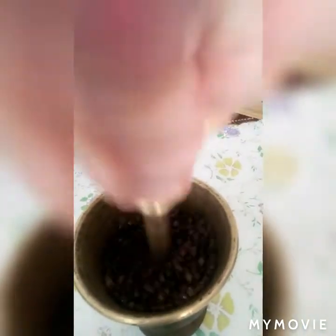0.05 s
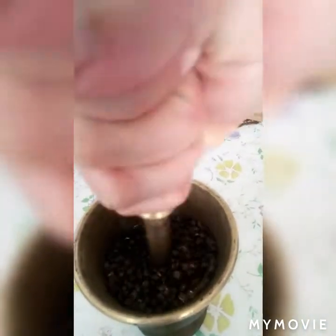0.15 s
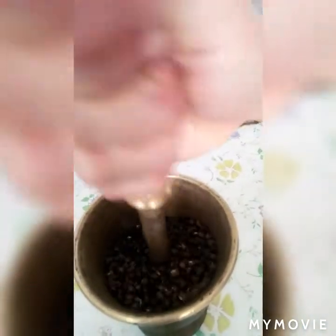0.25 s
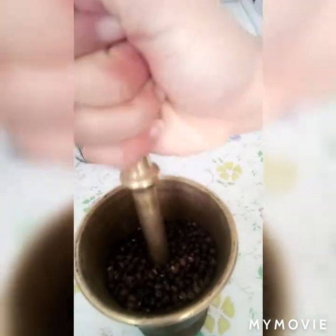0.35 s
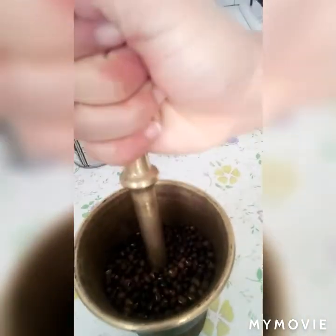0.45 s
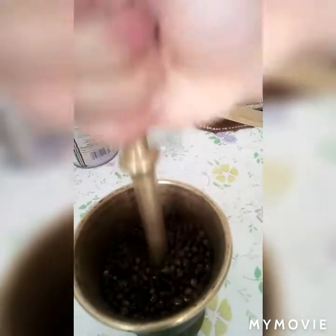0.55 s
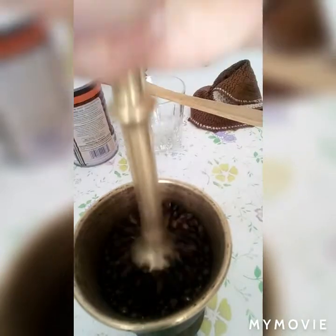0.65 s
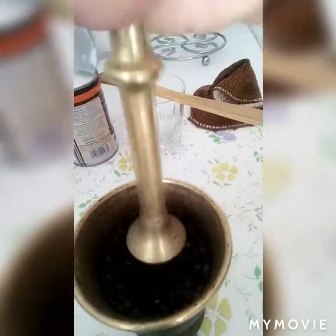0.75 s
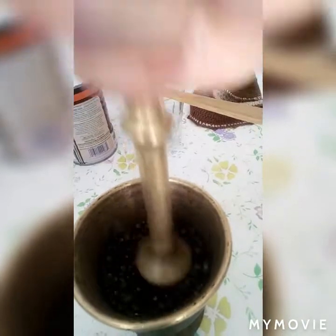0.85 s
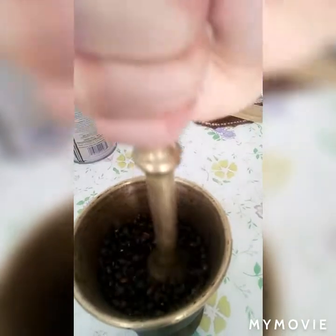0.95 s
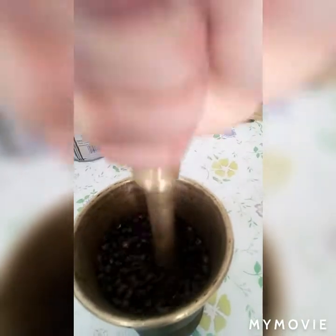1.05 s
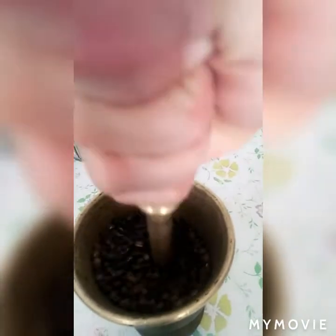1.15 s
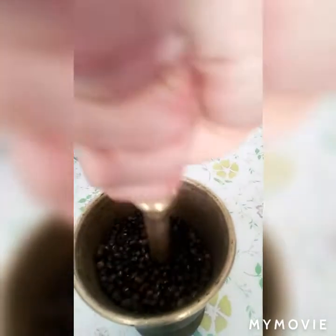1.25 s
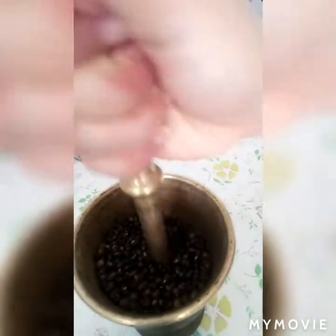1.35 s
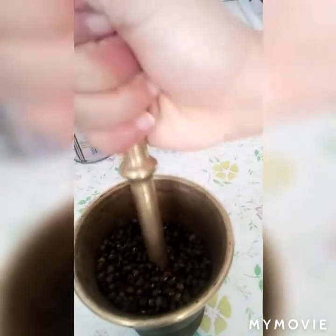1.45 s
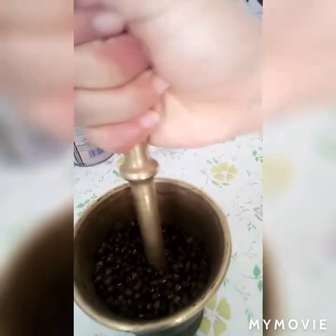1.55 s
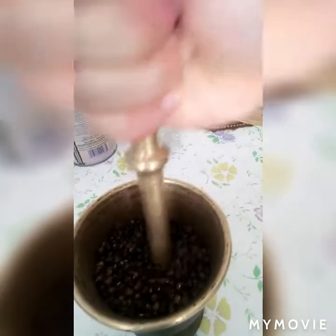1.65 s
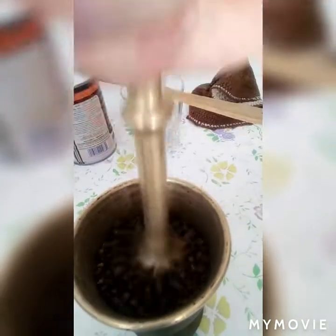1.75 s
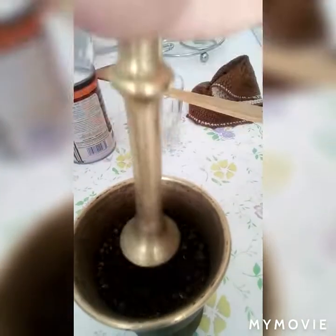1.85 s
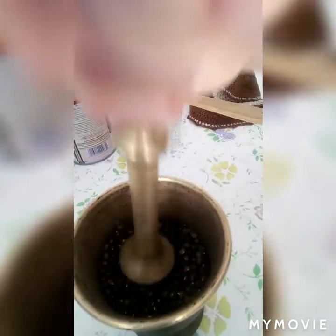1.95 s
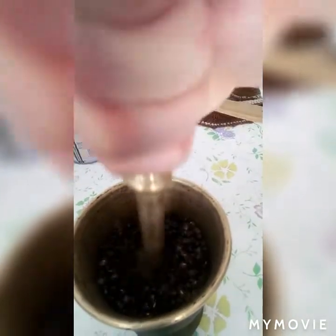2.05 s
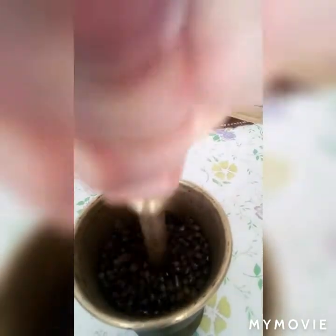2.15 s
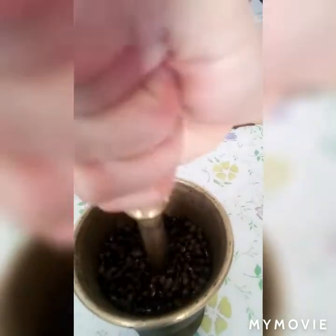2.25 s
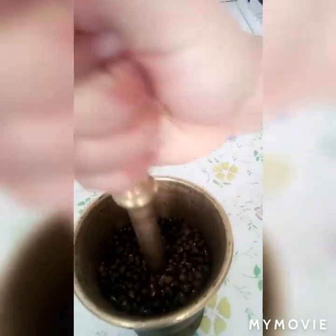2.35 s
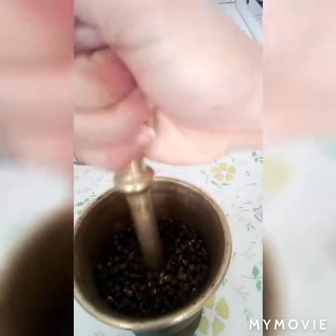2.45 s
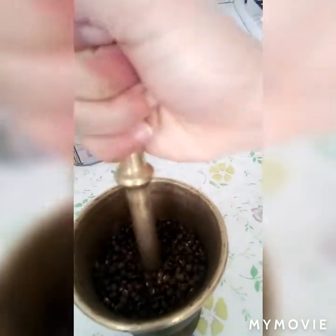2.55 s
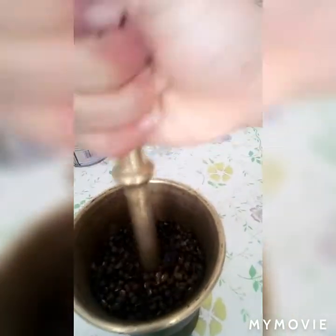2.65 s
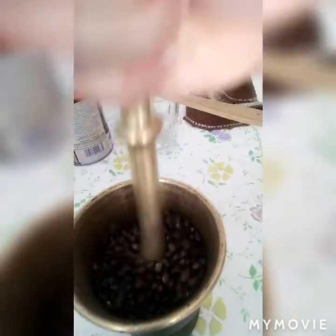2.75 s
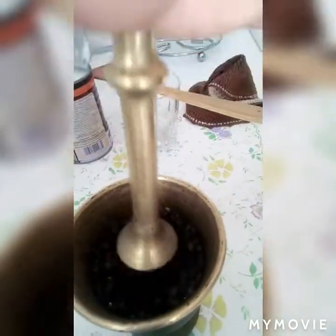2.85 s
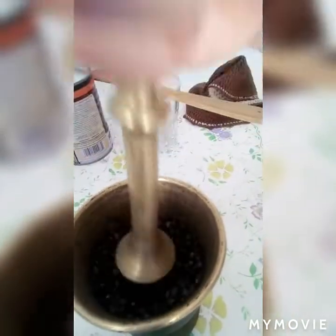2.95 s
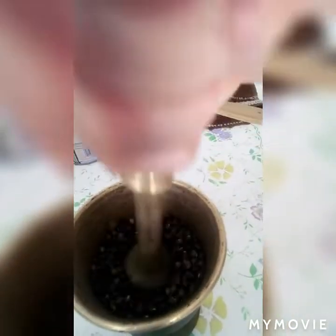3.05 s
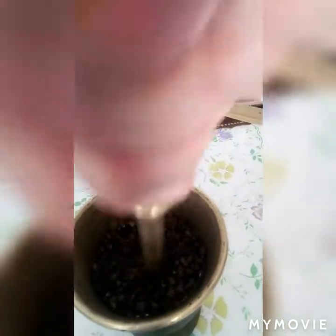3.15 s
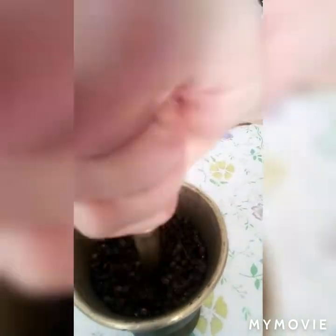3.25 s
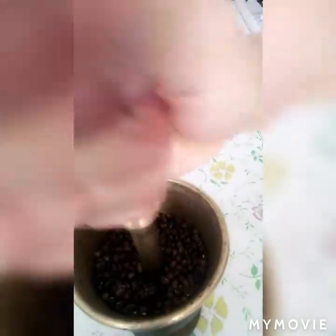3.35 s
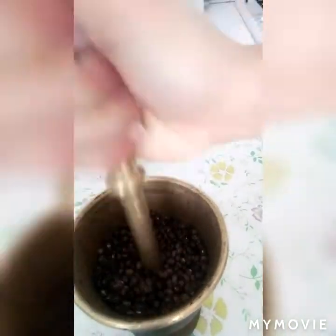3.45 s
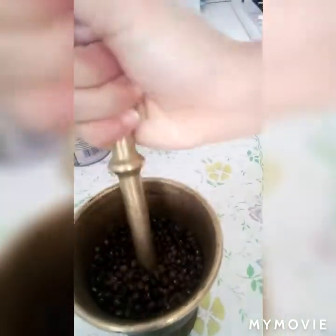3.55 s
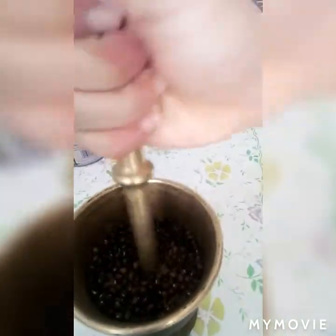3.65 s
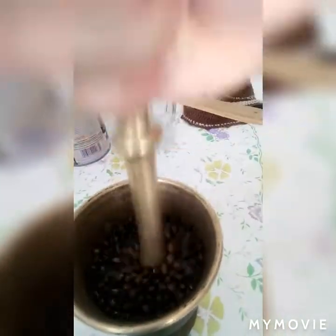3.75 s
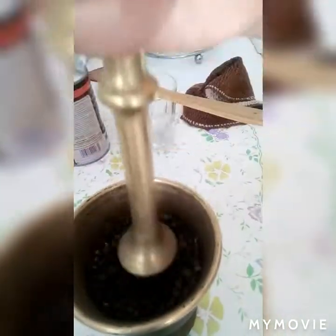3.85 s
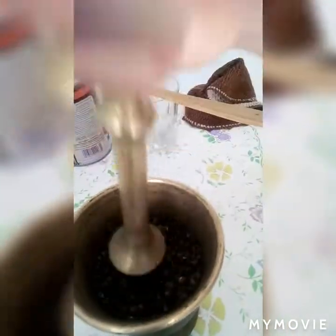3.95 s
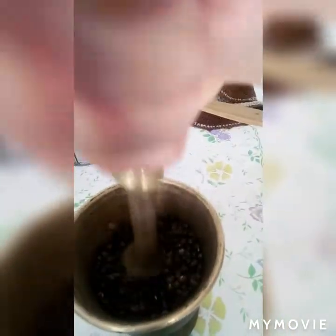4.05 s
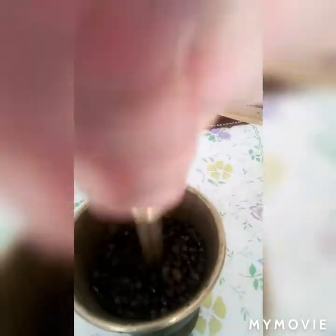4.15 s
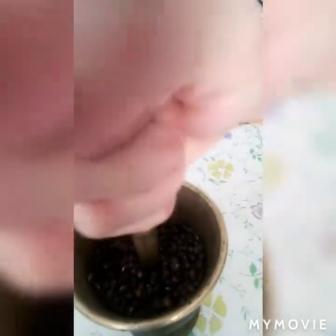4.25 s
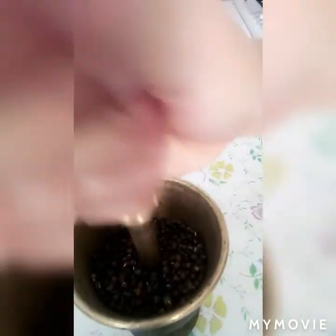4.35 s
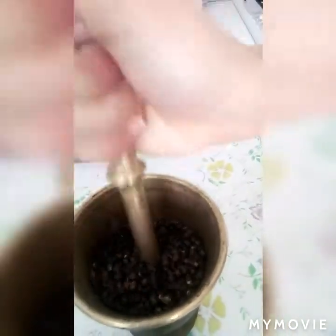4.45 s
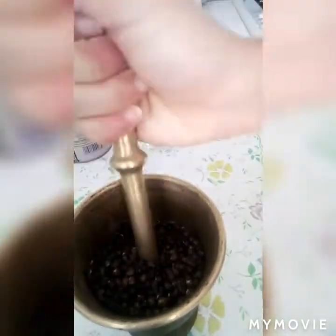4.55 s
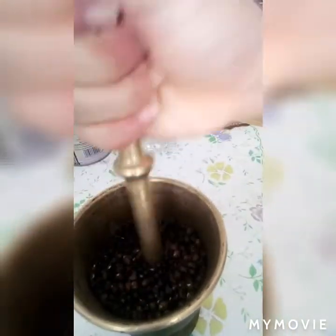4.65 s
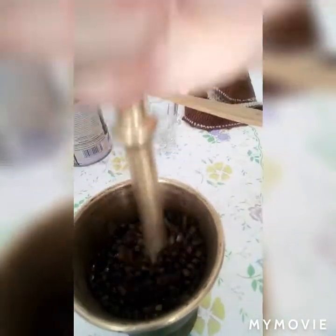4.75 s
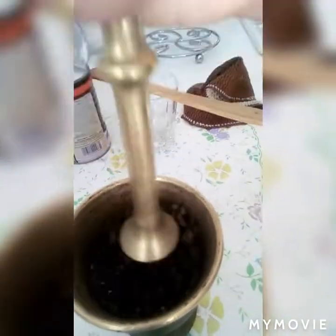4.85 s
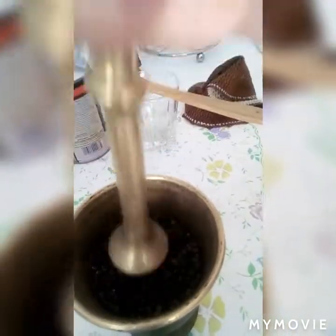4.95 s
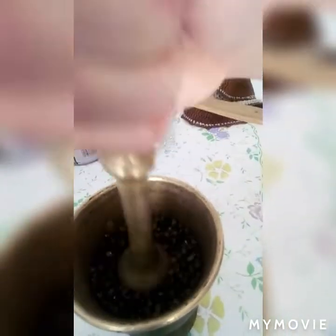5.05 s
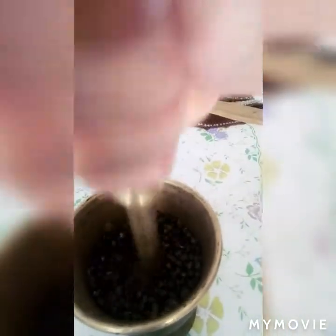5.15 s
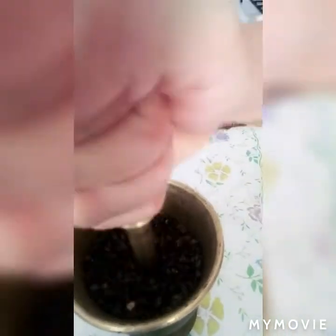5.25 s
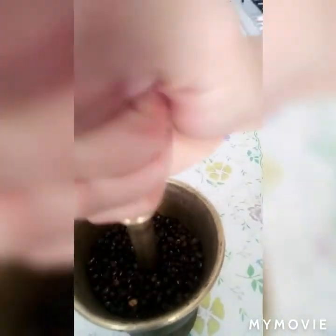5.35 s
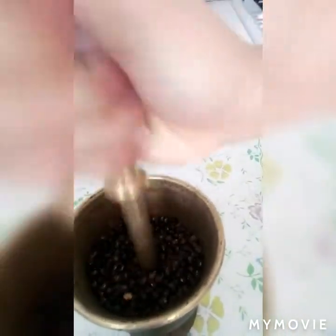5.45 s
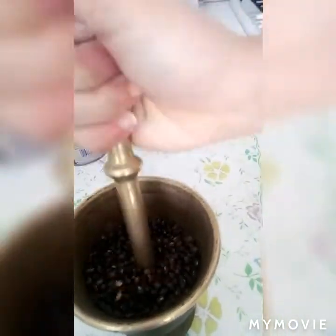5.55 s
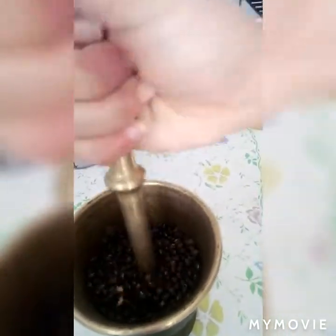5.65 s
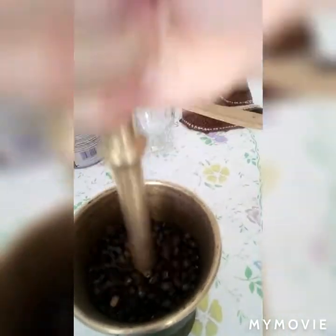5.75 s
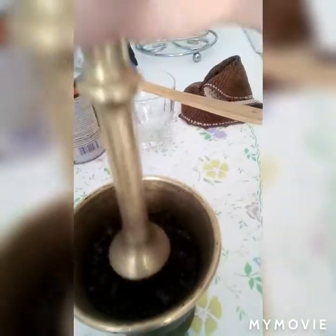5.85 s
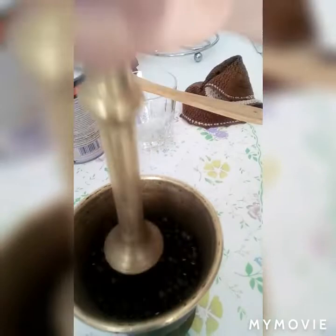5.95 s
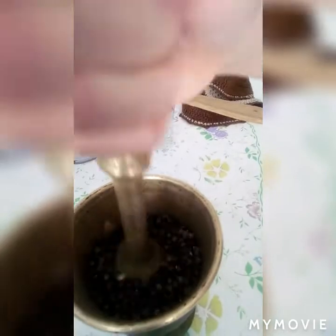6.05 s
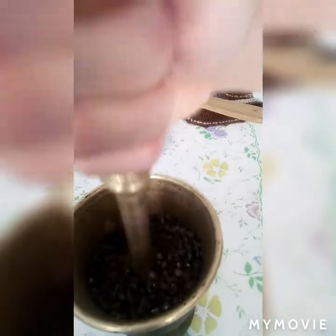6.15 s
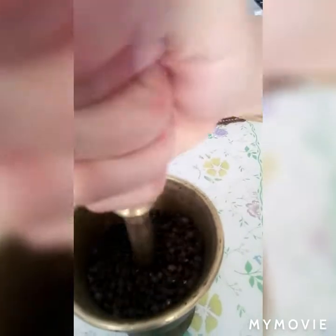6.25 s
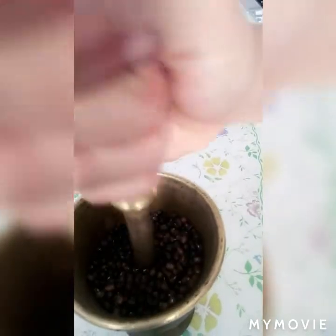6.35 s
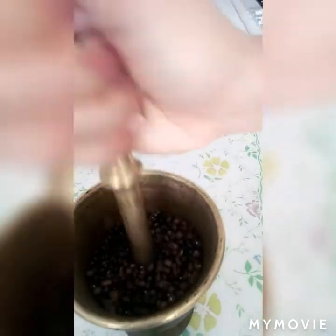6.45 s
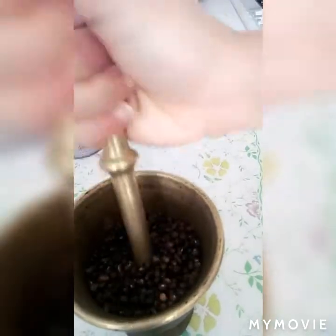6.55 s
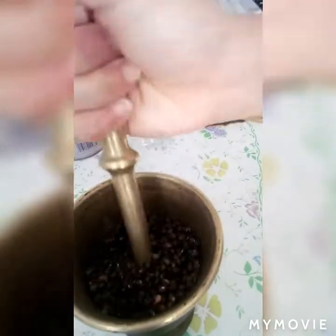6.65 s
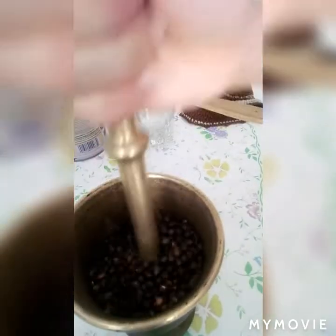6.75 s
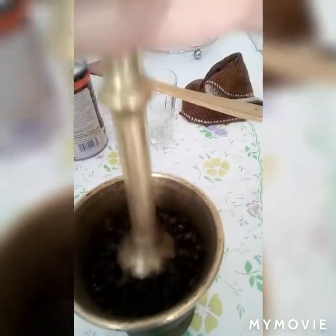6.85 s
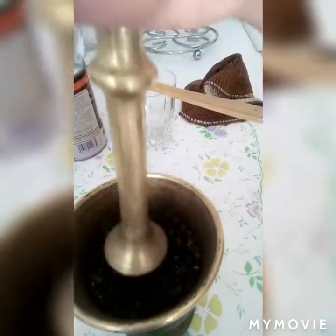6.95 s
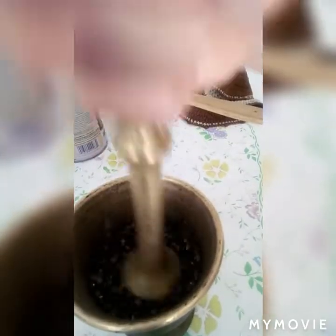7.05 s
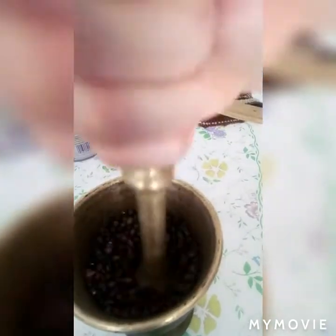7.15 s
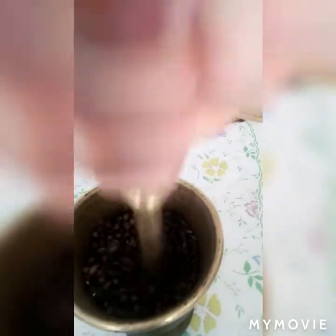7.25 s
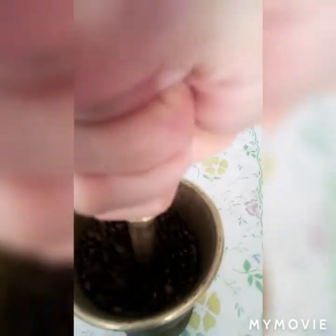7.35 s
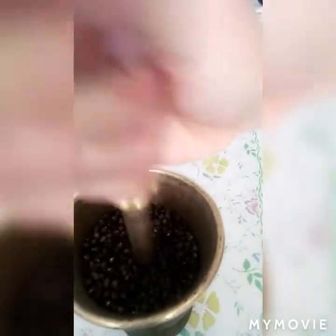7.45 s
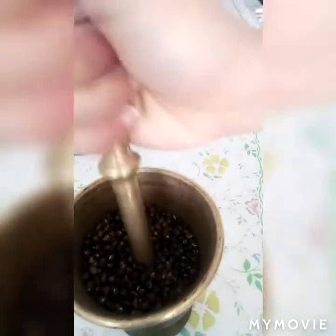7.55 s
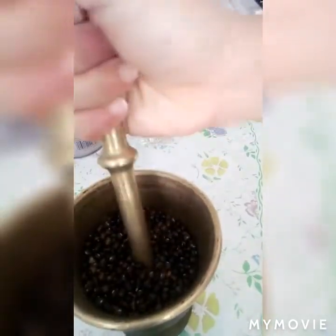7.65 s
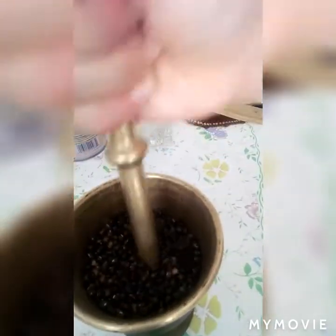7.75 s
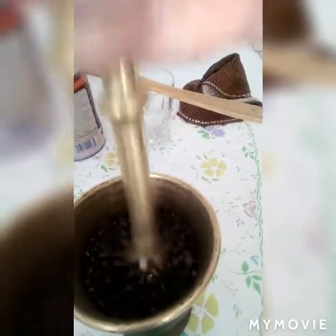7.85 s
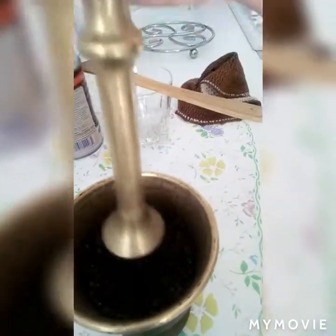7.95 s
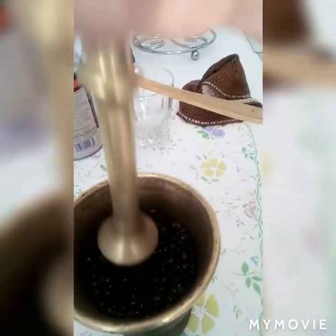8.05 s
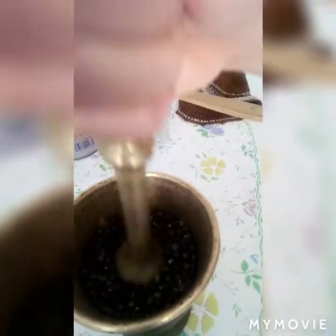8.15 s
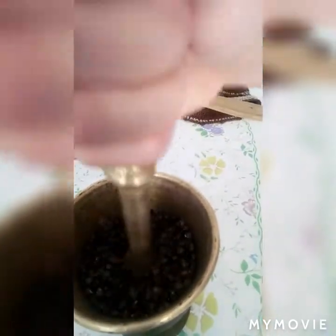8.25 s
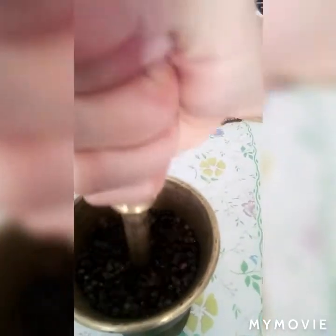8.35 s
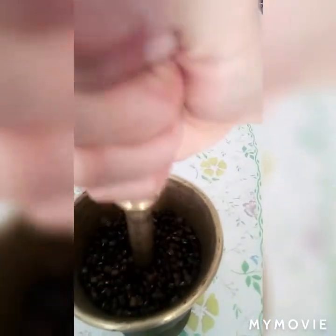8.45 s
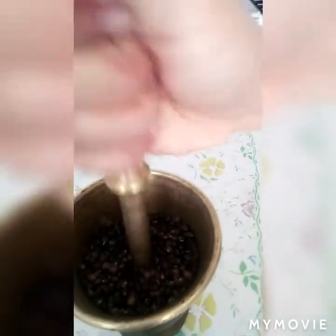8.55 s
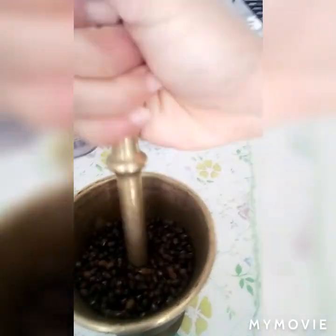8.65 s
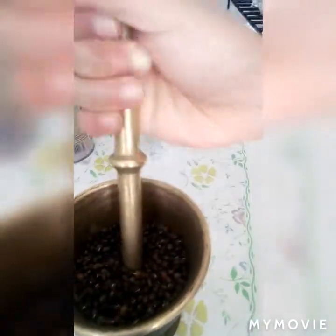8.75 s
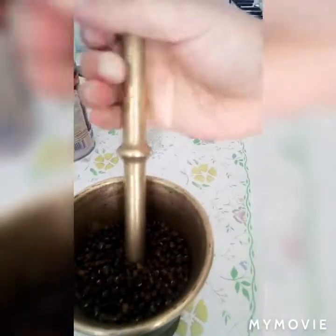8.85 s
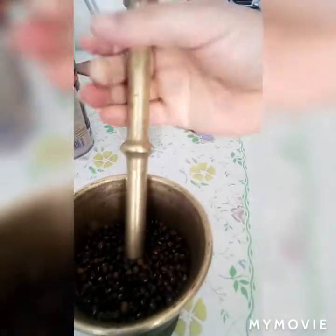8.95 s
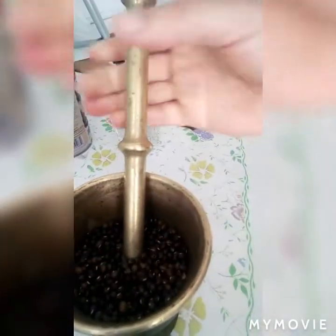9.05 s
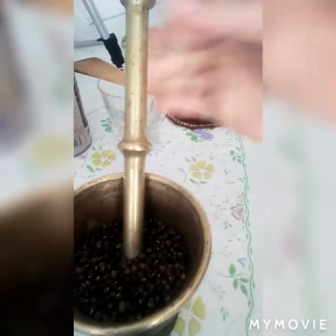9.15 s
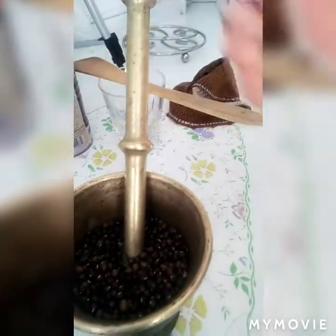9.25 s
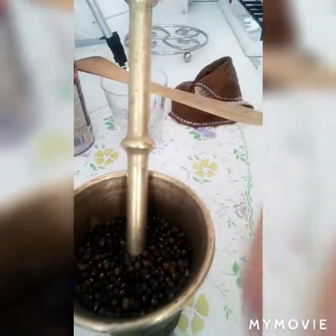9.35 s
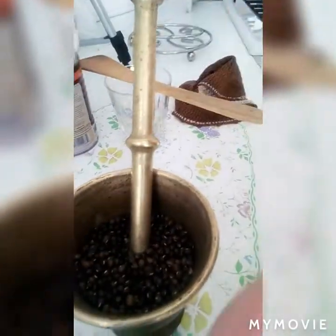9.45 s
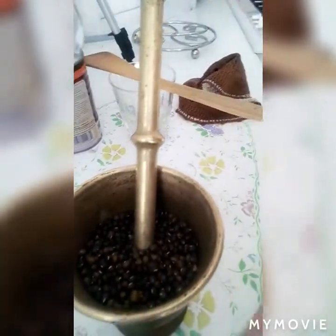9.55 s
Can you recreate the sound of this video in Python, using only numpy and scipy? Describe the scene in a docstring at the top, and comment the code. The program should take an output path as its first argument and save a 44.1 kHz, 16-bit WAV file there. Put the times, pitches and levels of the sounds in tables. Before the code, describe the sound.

Nine steady strokes of a brass pestle crush hard beans with bright rattle, low thumps and sharp snaps, ending in a ringing clink.

```python
"""A small microphone stands close to a brass mortar of dry beans on a kitchen table, in a faint hush.
About once a second a brass pestle drops into the beans, is pressed down, ground round and drawn up again.
Tapping beans become coloured rattle and feed the modes of the pestle; each press shakes the table and the bed,
and single beans crack as snaps of noise with a knock and a short room tail. At the end the shaft brushes the rim,
then the pestle is let fall against the wall: the clink rings bowl and pestle, and the strokes stop."""
import sys
import numpy as np
from scipy import signal
from scipy.io import wavfile

SR = 44100
rng = np.random.default_rng(int(sys.argv[2]) if len(sys.argv) > 2 else 0)


def master_out(mix):
    """Clip the mix to full scale and print it as 16-bit PCM to the path in sys.argv[1]."""
    frames = np.transpose(np.atleast_2d(mix))
    ceiling = np.clip(frames, -1, 1)
    pcm = np.round(ceiling * 32767).astype(np.int16)
    wavfile.write(sys.argv[1], SR, pcm)


N = 423357  # samples

# What drives each stroke; levels are those of the drive, before each source's colour and mix gain.
# The head drops into the beans. Each row: start in seconds, then bean rattle, pestle ring,
# table rumble and bed crunch in dB.
PLUNGES = [(-0.005, -34.5, -36, -52, -57), (1.049, -32.5, -37, -53, -57), (2.15, -31.5, -33.5, -51, -53.5),
           (3.205, -36, -35.5, -50.5, -56), (4.196, -34, -34.5, -55, -53), (5.222, -33.5, -35, -50.5, -53),
           (6.211, -31.5, -34.5, -49.5, -56.5), (7.222, -33, -35, -51, -52.5),
           (8.281, -33.5, -36, -54.5, -54.5)]
# Swell of the plunge in seconds, then its fall in dB per s: for rattle, ring, rumble, crunch.
PLUNGE_SWELL_S = [0.027, 0.016, 0.024, .04]
PLUNGE_FALL = [205, 170, 45.6, 100]
PLUNGE_STEEP = 0.45  # power of the swell in amplitude
TOUCH_DB, TOUCH_RISE = -17, 1200  # the first beans touched: dB under the plunge, dB per s

# The hand bears down. Each row: start in seconds, hold of rumble and crunch in seconds,
# then rattle, ring, rumble and crunch in dB.
PRESSES = [(0.248, 0.034, -27, -31.5, -25, -33), (1.298, .012, -29.5, -38, -32.5, -38),
           (2.374, 0.027, -33, -35.5, -30, -41), (3.408, 0.01, -28.5, -34, -23.5, -34.5),
           (4.39, 0.031, -27, -35, -25, -36), (5.427, 0.0076, -26, -38.5, -26, -33),
           (6.438, 0.016, -27, -35.5, -25, -34.5), (7.462, 0.036, -31.5, -30, -24.5, -32.5),
           (8.513, 0.003, -26.5, -35.5, -24.5, -35)]
# Rise and fall of the press in dB per s: for rattle, ring, rumble, crunch.
PRESS_RISE = [260, 190, 300, 310]
PRESS_FALL = [387, 240, 269, 300]
# The bed keeps giving way: dB relative to the press, then fall in dB per s, for the same four.
SETTLE_DB = [-19, -22.5, -15, -12.5]
SETTLE_FALL = [60, 80, 69, 90]

# The head is ground round once more. Each row: start in seconds, hold in seconds,
# then rattle, ring, rumble and crunch in dB.
GRINDS = [(0.44, 0.02, -50.5, -53, -41, -51), (1.588, 0.023, -51, -52.5, -38, -53.5),
          (2.585, .011, -54, -57, -36, -51), (3.636, 0.024, -53, -50.5, -33.5, -44.5),
          (4.61, 0.038, -48.5, -52.5, -35.5, -43), (5.671, 0.022, -51, -52.5, -33.5, -44.5),
          (6.643, 0.018, -51, -53.5, -37, -49), (7.587, 0.13, -56.5, -62.5, -41, -52.5),
          (8.688, 0.0074, -59, -67, -28.5, -43.5)]
# Rise and fall of the grind in dB per s: for rattle, ring, rumble, crunch.
GRIND_RISE = [140, 120, 110, 150]
GRIND_FALL = [156, 163, 162, 166]

# The head is drawn up through the beans. Each row: start in seconds, swell in seconds, hold in seconds,
# rattle in dB, its change over the hold in dB, ring in dB, its change over the hold in dB.
LIFTS = [(0.667, 0.13, 0.15, -35.5, -18, -35, -1), (1.742, 0.17, 0.1, -39, -18, -39, 5.3),
         (2.823, 0.13, 0.1, -36.5, -9, -34.5, 0), (3.799, 0.17, 0.084, -37, -14, -34.5, 1.5),
         (4.807, 0.12, 0.16, -37.5, -12, -37.5, 3), (5.841, 0.11, .11, -35.5, -10.5, -37, 5.4),
         (6.843, 0.087, 0.13, -40, -4, -40.5, 8.5), (7.871, 0.1, 0.12, -39, -8, -40, 9)]
# Fall after the lift in dB per s: for rattle, ring.
LIFT_FALL = [130, 260]
LIFT_STEEP, LIFT_CRUNCH_DB = 1.72, -42  # power of the swell in amplitude; crunch relative to the ring

# Single beans strike the lifted pestle. Each row: time in seconds, level in dB.
TAPS = [(0.8338, -24), (4.988, -23.5), (5.0405, -23.5)]
SCATTER_DB = -18  # beans thrown about by a crack, relative to its tabled level
SCATTER_FALL = 810  # dB per s, for scattered beans and for taps
# What is left between strokes, in dB: rattle, ring, rumble, crunch, sliding rattle of a lift.
STILL_DB = [-73.5, -81.5, -87, -91.5, -95]

# Colour of beans on beans and brass. Each row: frequency in Hz, relative level in dB.
RATTLE = [(850, -59.5), (1200, -12.5), (2500, -13.5), (3500, -31), (4200, -14.5), (5300, -23), (6200, -12),
          (7800, 4), (9000, 3), (11000, 1), (14000, -0.5)]
# Beans on the free shaft sound thinner. Each row: frequency in Hz, relative level in dB.
SHAFT = [(800, 0), (1500, -3), (3000, -5), (5000, -6), (7000, 0.5), (14000, -0.5)]
# Modes of the pestle: frequencies in Hz. Each row of the second: width in Hz, relative level in dB.
PESTLE_HZ = [1180, 3224, 5795, 5960, 6580, 7275, 8366, 8700, 10188, 10800, 10991, 11300, 12403, 13313,
             13650, 14089]
PESTLE_MODES = [(14, -28), (18, -18), (10.4, -12), (19.9, -24), (13.9, -11), (17.7, -7.5), (9.1, -5.5),
                (34.6, -11.5), (18.4, -1), (20, -31.5), (22, -7.5), (20.4, -37), (24, -14.5), (35, -21.5),
                (18, -7), (22, -21.5)]
# Resonances of the table. Each row: frequency in Hz, width in Hz, relative level in dB.
TABLE = [(94, 45.3, 0), (129, 42.6, -1), (184.4, 19, -3), (293.6, 34.5, -1), (432.4, 52.6, -3)]
# Resonances of the bean bed. Each row: frequency in Hz, width in Hz, relative level in dB.
BED = [(760, 120, 0.5), (986, 120, -4.5), (1302, 130, 2), (1457, 110, -4), (2450, 93, -6),
       (4220, 830, -7.5)]

# Single beans cracking. Each row: time in seconds, level in dB, knock in the bean bed in dB relative to it.
CRACKS = [(0.2472, -14.5, -39), (0.407, -18, -19), (0.4365, -16, -53), (0.471, -29.5, -27),
          (0.498, -30.5, -33), (1.507, -45, -10), (1.541, -32, -16.5), (1.5871, -13.5, -29),
          (2.601, -21, -18), (3.2272, -35, -5.5), (3.3962, -16.5, -39), (3.417, -19, -21),
          (3.43, -17.5, -29.5), (3.5755, -26.5, -19.5), (3.665, -35, -32), (3.686, -23, -31),
          (4.3852, -11.5, -22.5), (4.4105, -15, -32), (4.468, -30, -27), (4.4863, -25, -38),
          (4.5833, -32.5, -11), (4.598, -21.5, -28), (4.633, -22.5, -33), (5.4017, -15, -19.5),
          (5.522, -30.5, -5), (5.5834, -25, -10.5), (5.6313, -29.5, -24.5), (5.6726, -11.5, -43),
          (5.6912, -19, -14), (6.4291, -8.5, -47), (6.5934, -22, -37), (6.679, -27, -19), (7.461, -10, -44),
          (7.6953, -31.5, -21), (8.6393, -38.5, -14), (8.6518, -17, -18.5), (8.67, -21, -12.5),
          (8.7008, -22.5, -41.5), (8.74, -18.5, -32.5), (8.85, -27.5, -30), (8.909, -49, -4)]
# Colour of snap and brass chatter. Each row: frequency in Hz, relative level in dB.
SNAP = [(300, -5.5), (1300, -10.5), (2400, -24), (5000, -16.5), (7500, -2.5), (9000, 4.5), (13500, -6.5),
        (15500, -43), (17000, -70.5)]
# Colour of the duller knock. Each row: frequency in Hz, relative level in dB.
KNOCK = [(150, -36), (400, -7.5), (1000, -7.5), (1400, 5), (2400, -7.5), (3000, -14.5), (5000, -39.5)]
# The kitchen around. Each row: frequency in Hz, time to die by 60 dB in seconds.
KITCHEN = [(200, 0.53), (1000, 0.52), (4000, 0.37), (10000, 0.27)]

# The shaft brushes the rim: start in seconds, end in seconds, level of the drive in dB.
LET_GO = (8.985, 9.085, -69)
# Modes a light touch wakes: frequencies in Hz. Each row of the second: width in Hz, relative level in dB.
RIM_HZ = [4745, 7760]
RIM_MODES = [(7, -5), (14, 0)]
# The pestle falls against the wall and chatters. Each row: time in seconds, level of the force in dB.
CLINKS = [(9.0925, -2), (9.107, -16)]
# Modes of the bowl: frequencies in Hz. Each row of the second: width in Hz, relative level in dB.
BOWL_HZ = [974, 2410, 3305, 3994, 4745, 6158, 6729, 7564, 7760, 8441, 8748, 9230, 11200]
BOWL_MODES = [(20, -25), (40, -19.5), (45, -12.5), (30, -19), (10, -23), (16, -14), (30, -10), (45, -7),
              (22, -9.5), (25.1, -10), (35, -9.5), (40, -21.5), (35, -31)]

# Colour of the faint hush. Each row: frequency in Hz, relative level in dB per Hz.
HUSH = [(13, -33.5), (22, -0.5), (42, -6.5), (98, -22), (190, -20), (451, -29.5), (528, -15), (648, -24.5),
        (2260, -28.5), (5000, -38.5), (6500, -68), (11000, -120)]
HUSH_DB = -81  # rms, ahead of the band limit
# Response of the small microphone. Each row: frequency in Hz, gain in dB.
MICROPHONE = [(25, -14), (55, -14), (90, -1), (110, 0), (14250, 0), (14380, -40), (16000, -42)]
EDGE_HZ = 15525  # band limit


def gain_of(db):
    """Amplitude for a level in dB; twice the dB gives power."""
    return 10 ** (np.asarray(db) / 20)


def evened(x):
    """Scale to an rms of 1."""
    return x / np.sqrt(np.mean(x ** 2) + 1e-20)


def read(points, hz):
    """Read a table between its rows, along log frequency."""
    f, value = np.transpose(points)
    return np.interp(np.log(hz + 1), np.log(f + 1), value)


def add(mix, s, sound):
    """Lay a sound into the mix at s seconds."""
    part = mix[round(s * SR):][:len(sound)]
    part += sound[:len(part)]


def coloured(x, points):
    """Causal filter with the given spectrum, at unit energy: the phase follows from the log gain."""
    hz = abs(np.fft.fftfreq(8192, 1 / SR))
    log_gain = np.log(gain_of(np.maximum(read(points, hz), -100)))
    response = np.fft.ifft(np.exp(np.conj(signal.hilbert(log_gain)))).real[:4096]
    return signal.oaconvolve(x, response / np.linalg.norm(response))[:len(x)]


def resonate(x, hz, width):
    """One mode; white noise of rms 1 comes out with rms 1."""
    r = np.exp(-np.pi * width / SR)
    pole = r * np.exp(2j * np.pi * hz / SR)
    return np.sqrt(2 * (1 - r ** 2)) * signal.lfilter([1], [1, -pole], x).real


def peak(since, db, rise, hold, fall):
    """Power that climbs, holds and sinks at steady dB per second."""
    climb_db = rise * np.maximum(-since, 0)
    sink_db = fall * np.maximum(since - hold, 0)
    return gain_of(2 * (db - climb_db - sink_db))


def swell(since, db, rise_s, steep, hold, change_db, fall):
    """Power that starts from nothing, swells, drifts while it holds and sinks."""
    drift_db = change_db * np.clip((since - rise_s) / (hold + 1e-9), 0, 1)
    growth = np.clip(since / rise_s, 0, 1) ** (2 * steep)
    return growth * peak(since, db + drift_db, 0, rise_s + hold, fall)


def strokes():
    """The hand's five gains at every sample: rattle, ring, rumble, crunch and the thinner rattle of a lift."""
    t = np.arange(0, N / SR, 1 / 1000)[:, None]
    every = gain_of(2 * np.array(STILL_DB)) + 0 * t
    power = every[:, :4]  # a view: adding here adds to every
    for s, *db in PLUNGES:
        power += swell(t - s, np.array(db), np.array(PLUNGE_SWELL_S), PLUNGE_STEEP, 0, 0, np.array(PLUNGE_FALL))
        # the touch climbs until s, then stays level for the rattle's swell
        power += (t < s + PLUNGE_SWELL_S[0]) * peak(t - s, np.add(db, TOUCH_DB), TOUCH_RISE, 1, 0)
    for s, hold, *db in PRESSES:
        rise, holds = np.array(PRESS_RISE), hold * np.array([0, 0, 1, 1])
        power += peak(t - s, np.array(db), rise, holds, np.array(PRESS_FALL))
        power += peak(t - s, np.add(db, SETTLE_DB), rise, 0, np.array(SETTLE_FALL))
    for s, hold, *db in GRINDS:
        power += peak(t - s, np.array(db), np.array(GRIND_RISE), hold, np.array(GRIND_FALL))
    for s, rise_s, hold, rattle_db, rattle_change_db, ring_db, ring_change_db in LIFTS:
        levels = np.array([rattle_db, ring_db])
        changes = np.array([rattle_change_db, ring_change_db])
        slide = swell(t - s, levels, rise_s, LIFT_STEEP, hold, changes, np.array(LIFT_FALL))
        every[:, [4, 1]] += slide
        power[:, 3] += slide[:, 1] * gain_of(2 * LIFT_CRUNCH_DB)
    for s, db, _ in CRACKS:
        power[:, :1] += (t > s) * peak(t - s, db + SCATTER_DB, 0, 0, SCATTER_FALL)
    for s, db in TAPS:
        power[:, 1:2] += (t > s) * peak(t - s, db, 0, 0, SCATTER_FALL)
    every *= t < CLINKS[0][0]  # the strokes stop at the first clink
    return [np.interp(np.arange(N) / SR, t[:, 0], np.sqrt(p)) for p in every.T]


def taps_of_beans(per_s, spread_db):
    """Random taps of random sign, mostly small, a few large; rms 1."""
    spread = gain_of(spread_db * np.minimum(rng.exponential(1, N), 5))
    size = spread * rng.standard_normal(N)
    return evened(size * (rng.random(N) < per_s / SR))


def beans(gain):
    """Beans tick against each other and the brass."""
    return coloured(gain * taps_of_beans(per_s=11000, spread_db=2.5), RATTLE)


def rattle(rattling, sliding):
    """Beans around the head, and the thinner sound of beans on the free shaft as it is drawn up."""
    return gain_of(3.0) * (beans(rattling) + coloured(beans(sliding), SHAFT))


def ring(drive, modes_hz, modes):
    """Taps feed the modes of a brass part, which ring on after they stop; each mode is fed by other taps."""
    taps = taps_of_beans(per_s=5500, spread_db=3.5)
    shifts = rng.integers(0, N, len(modes))
    return sum(gain_of(db) * resonate(drive * np.roll(taps, shift), hz, width)
               for hz, (width, db), shift in zip(modes_hz, modes, shifts))


def pestle(drive, pressure, clink_force):
    """The two long bending modes are held still while the head is pressed into the beans."""
    free = 1 / np.sqrt(1 + (pressure / gain_of(-42.0)) ** 0.33)
    blow = gain_of(-14.5) * clink_force
    bending = ring(free * drive + .2 * blow, PESTLE_HZ[:2], PESTLE_MODES[:2])
    return bending + ring(drive + blow, PESTLE_HZ[2:], PESTLE_MODES[2:])


def pressed(slips, modes):
    """Slips of the bean bed shake broad resonances; twice through each keeps the valleys dark."""
    return sum(gain_of(db) * np.sqrt(w / SR) * resonate(resonate(slips, hz, w), hz, 2 * w)
               for hz, w, db in modes)


def table(rumbling):
    """Sparse slips under the press make the table top rumble at its low resonances."""
    return pressed(rumbling * taps_of_beans(per_s=500, spread_db=1.0), TABLE)


def bed(crunching):
    """Denser slips make the bean bed crunch at its higher, broader resonances."""
    return pressed(crunching * taps_of_beans(per_s=2300, spread_db=3.5), BED)


def cracks():
    """One sharp snap, a few ms of splinters and a duller knock."""
    force, knock, snap, t = np.zeros(N), np.zeros(N), np.zeros(N), np.arange(1500) / SR
    for s, db, knock_db in CRACKS:
        add(snap, s, gain_of([db + 5.5]))  # a single sample
        splinters = gain_of(-60 * t / .015) + .06 * gain_of(-60 * t / .06)
        add(force, s, gain_of(db) * splinters)
        add(knock, s - .001, gain_of(db + knock_db - 60 * t / 0.044))
    snaps = coloured(snap + gain_of(-4) * force * rng.standard_normal(N), SNAP)
    return snaps + gain_of(-1.5) * coloured(knock * rng.standard_normal(N), KNOCK)


def kitchen(x):
    """The room answers with a noise tail 300 samples late, each band dying at its own speed."""
    hz, t, z = signal.stft(rng.standard_normal(SR // 2), SR, nperseg=256)
    decay = gain_of(-60 * t / read(KITCHEN, hz)[:, None])
    tail = signal.istft(z * decay, SR, nperseg=256)[1]
    return signal.oaconvolve(x, np.append(np.zeros(300), tail / np.linalg.norm(tail)))[:N]


def brush():
    """The shaft brushes the rim: a light touch, faded in over 30 ms, wakes two narrow modes."""
    start, end, db = LET_GO
    t = np.arange(N) / SR
    touch = gain_of(db) * np.clip((t - start) / .03, 0, 1) * (t < end)
    return ring(touch, RIM_HZ, RIM_MODES)


def clinks():
    """Brass on brass: chatter and a thud of the table just before; also the force felt by bowl and pestle."""
    force, thud, t = np.zeros(N), np.zeros(N), np.arange(8000) / SR
    for s, db in CLINKS:
        add(force, s, gain_of(db - 60 * t / .07) * (1 - np.exp(-t / .002)))
    thump = gain_of(-25.5 - 60 * t / 0.025) * np.sin(2 * np.pi * 230 * t)
    add(thud, CLINKS[0][0] - .008, thump)
    chatter = gain_of(-8.5) * coloured(force * rng.standard_normal(N), SNAP)
    knock = gain_of(-21) * coloured(force * rng.standard_normal(N), KNOCK)
    return thud + chatter + knock, force


def bowl(clink_force):
    """The clink force, broken into taps, sets the modes of the mortar wall ringing."""
    return ring(gain_of(-8) * clink_force, BOWL_HZ, BOWL_MODES)


def scene():
    """All sources close to the microphone, plus the kitchen's answer to cracks, clink and bowl."""
    rattling, ringing, rumbling, crunching, sliding = strokes()
    clink, clink_force = clinks()
    strokes_heard = rattle(rattling, sliding) + pestle(ringing, rumbling, clink_force)
    pressing = table(rumbling) + bed(crunching)
    crack = cracks()
    bowl_ring = bowl(clink_force)
    echo = kitchen(gain_of(-13) * crack + gain_of(-10.5) * (clink + bowl_ring))
    return (strokes_heard + pressing + crack + brush() + clink + bowl_ring + echo)[None]


def record(dry):
    """The microphone loses deep bass and top treble and adds a faint hush; then the band limit."""
    hz = np.linspace(0, SR / 2, 1025)
    response = signal.firwin2(2047, hz, gain_of(read(MICROPHONE, hz)), fs=SR)
    heard = signal.oaconvolve(dry, response[None], "same")
    heard = heard + gain_of(HUSH_DB) * evened(coloured(rng.standard_normal(N), HUSH))
    band_limit = signal.firwin(511, EDGE_HZ, window=("kaiser", 9), fs=SR)
    return signal.oaconvolve(heard, band_limit[None], "same")


dry = scene()
out = record(dry)
master_out(out)
```